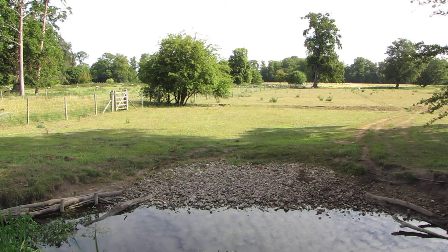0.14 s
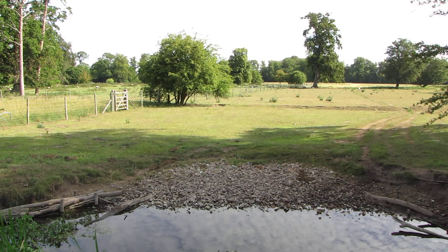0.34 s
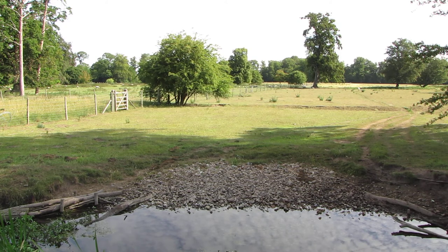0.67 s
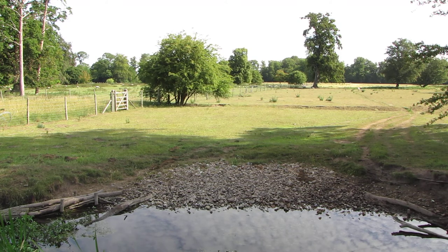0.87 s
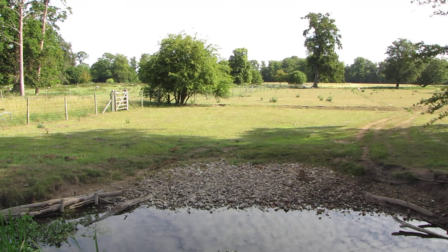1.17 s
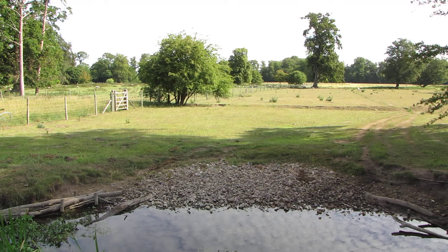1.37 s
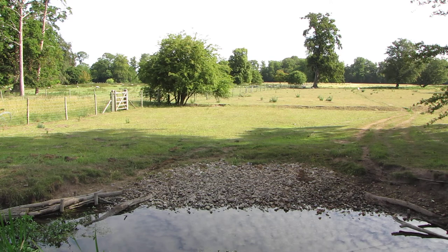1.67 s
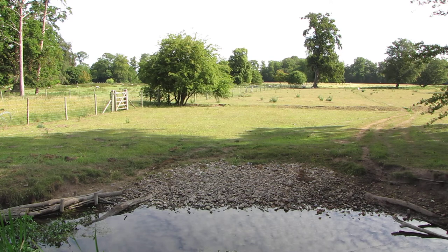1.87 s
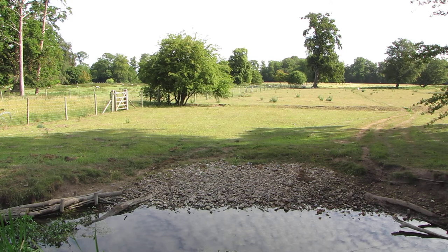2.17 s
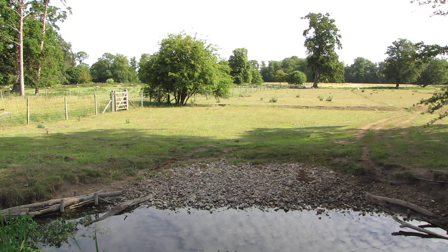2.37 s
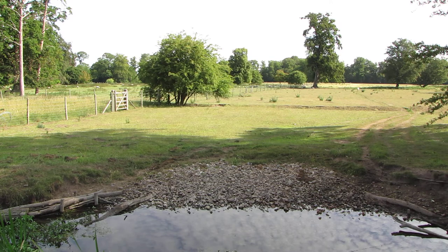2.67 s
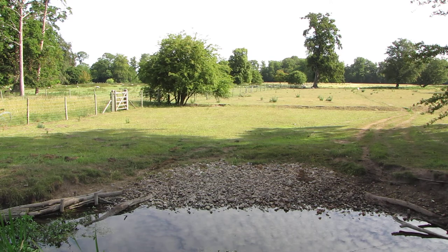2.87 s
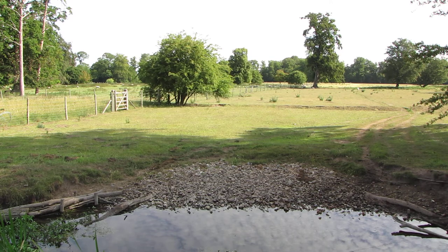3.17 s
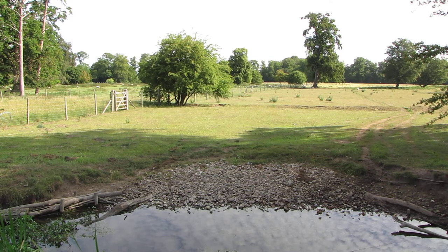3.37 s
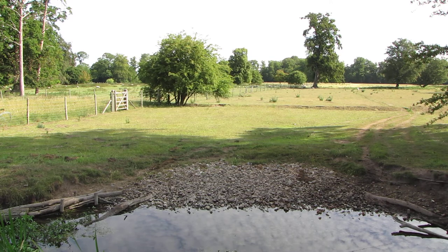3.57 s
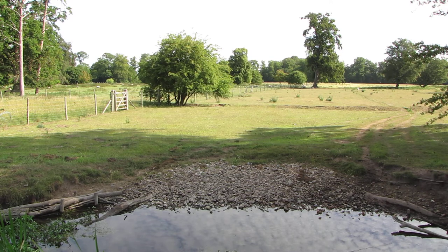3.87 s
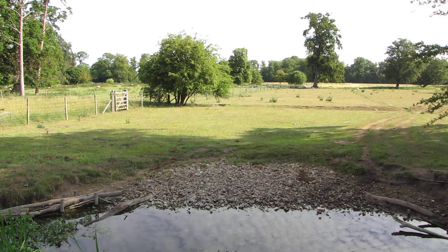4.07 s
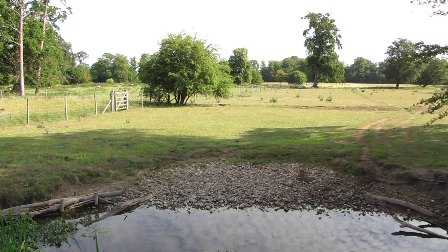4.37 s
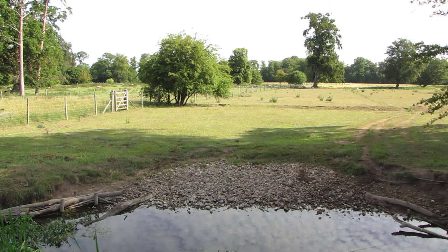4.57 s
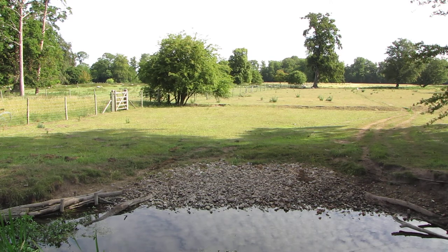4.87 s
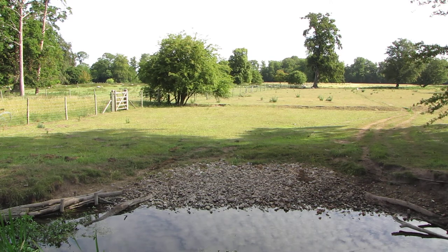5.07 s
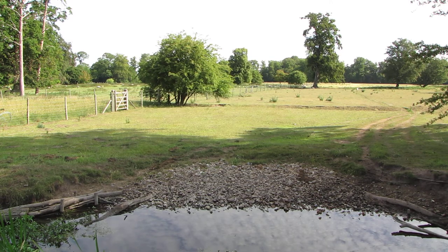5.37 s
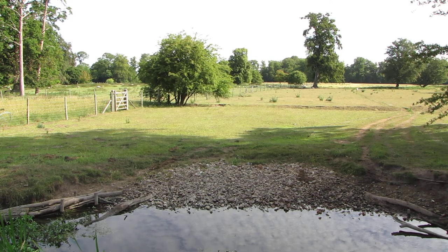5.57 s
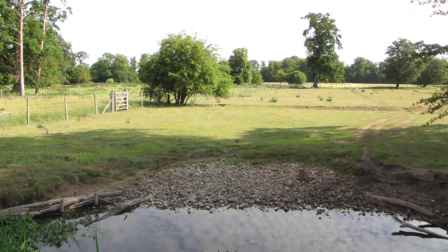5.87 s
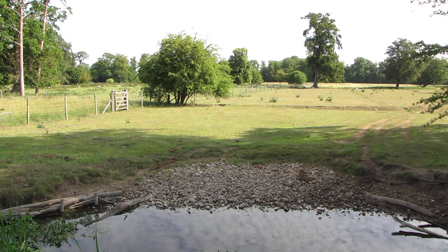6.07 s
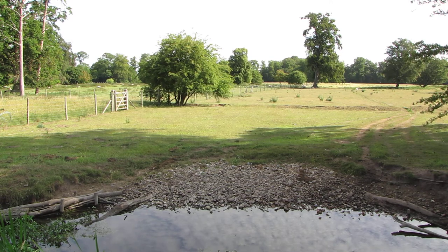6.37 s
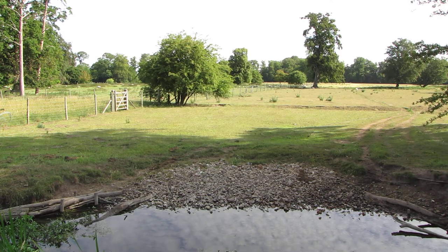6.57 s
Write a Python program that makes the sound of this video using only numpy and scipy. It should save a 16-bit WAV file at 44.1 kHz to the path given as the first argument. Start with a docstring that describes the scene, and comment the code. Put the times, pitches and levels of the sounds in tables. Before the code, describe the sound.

Quiet field beside a pond, heard through a hissy stereo microphone exposed to wind. Distant tyres and engines hum continuously, slightly to the right. Sparse tiny bird calls come first, then a faint slowing rattle, perhaps a farther sheep, then two clear rising whistles and small cheeps. Low gusts buffet more strongly in the second half, around a single weak, quavering sheep bleat near the end.

```python
"""Open pasture with trees

A distant sheep bleats once by pulse-driven resonance, after a fainter rasping chatter of rough pulses.
Small birds whistle and cheep as sines of moving pitch, and the trees scatter these calls.
Far traffic drones from the right and wind buffets two microphone ports, both as coloured noise;
the microphones hiss."""
import sys
import numpy as np
from scipy import signal
from scipy.fft import rfft, irfft, next_fast_len
from scipy.io import wavfile
from scipy.ndimage import uniform_filter1d

SR = 44100
rng = np.random.default_rng(int(sys.argv[2]) if len(sys.argv) > 2 else 0)


def transcribe(u):
    """Save the signal u as a 16-bit wav file named by the first command-line argument.

    u: samples, shape (n,) or (channels, n), limited to [-1, 1]; the rate is SR.
    q: integer samples, one column per channel.
    """
    v = np.clip(np.atleast_2d(u).T, -1, 1)
    q = np.round(v * 32767).astype(np.int16)
    wavfile.write(sys.argv[1], SR, q)


N = 296793  # length in samples

LAG_S_PER_DB = 2.8e-5  # delay between the ports for each dB of level difference


def undb(db):
    """Decibel law: the amplitude gain of a level in dB."""
    return 10 ** (np.asarray(db) / 20)


def unit(x):
    """Normalisation: scales a signal to rms 1."""
    return x / np.sqrt(np.mean(x ** 2))


def along(hz, table):
    """Logarithmic frequency scale: interpolates (f/Hz, value) points."""
    f, values = np.transpose(table)
    return np.interp(np.log(hz + 1e-3), np.log(f), values)


def curve(table):
    """Linear interpolation in time: the columns of a (t/s, value, ..) table, one value a sample."""
    s, *columns = np.transpose(table)
    return [np.interp(np.arange(N) / SR, s, c) for c in columns]


def pan(db):
    """Interaural level difference: left and right gains for a left minus right level in dB."""
    return undb(np.array([db, -db]) / 2).reshape(2, -1)


def walk(rate_hz):
    """Slow random modulation: levels held, then smoothed by two moving averages; rms 1."""
    k = int(SR / rate_hz)
    held = np.repeat(rng.standard_normal(N // k + 1), k)
    return unit(uniform_filter1d(uniform_filter1d(held, k), k)[:N])


def noise(colour, shared=((1, 0),), lag_s=0., balance=((1, 0),)):
    """Partial coherence: coloured noise with a shared part, late on the left, and each port's own."""
    size = next_fast_len(N)
    hz = np.arange(size // 2 + 1) * SR / size
    both, left, right = rfft(rng.standard_normal((3, size)))
    share = np.clip(along(hz, shared), 0, 1)
    lag = np.array([np.exp(-2j * np.pi * hz * lag_s), np.ones(len(hz))])
    pair = np.sqrt(share) * both * lag
    pair = pair + np.sqrt(1 - share) * np.array([left, right])
    spectrum = pair * undb(along(hz, colour)) * pan(along(hz, balance))
    return unit(irfft(spectrum, size)[:, :N])


def ring(x, hz, width_hz):
    """Resonance: a band-pass peak applied twice, gain 1 at the centre."""
    b, a = signal.iirpeak(hz, hz / width_hz, SR)
    return signal.lfilter(b, a, signal.lfilter(b, a, x))


def pulses(hz, jitter):
    """Irregular pulse train: one click a cycle, the cycles uneven in length and size."""
    cycle = np.floor(np.cumsum(hz * (1 + jitter * walk(180))) / SR)
    return np.diff(cycle, prepend=cycle[0]) * undb(1.9 * rng.standard_normal(N))


# course of the bleat: t/s, pitch f/Hz, level/dB before the quaver, quaver depth (0-1), mouth opening (0-1)
BLEAT_COURSE = [(5.16, 198.7, -72, .6, 0), (5.235, 199.4, -57, .6, 0), (5.4, 206, -55, .58, 0.75),
                (5.48, 223.2, -55, .32, .85), (5.6, 224, -56.5, .2, .85), (5.72, 220.4, -57.5, .12, .85),
                (5.84, 221.7, -62, 0, .7), (6.0, 219, -70, .1, .6)]
# throat resonances: f/Hz, width/Hz, level/dB, level gained with the mouth fully open/dB
THROAT_RESONANCES = [(1740, 340, 1, 1), (2750, 420, -1.5, 0), (3540, 600, -8.5, 5), (4200, 520, -23, 14)]
QUAVER_HZ, QUAVER_TOP_S = 13.4, 5.325  # rate; time of one crest
QUAVER_PITCH = .03  # pitch swing as a share of the pitch, at full depth
BLEAT_TOP_HZ = 4400


def sheep():
    """Source-filter principle: glottal pulses and breath ring the throat, quavering in level and pitch."""
    t = np.arange(N) / SR
    hz, db, depth, mouth = curve(BLEAT_COURSE)
    quaver = np.cos(2 * np.pi * QUAVER_HZ * (t - QUAVER_TOP_S))
    breath = .5 * rng.standard_normal(N)
    voice = unit(pulses(hz * (1 + QUAVER_PITCH * depth * quaver), jitter=.02)) + breath
    throat = np.zeros(N)
    for k, (f, width_hz, level_db, open_db) in enumerate(THROAT_RESONANCES):
        # neighbouring resonances swing in opposite senses, which fills the valleys between them
        throat += (-1) ** k * undb(level_db + open_db * mouth) * ring(voice, f, width_hz)
    low_pass = signal.butter(8, BLEAT_TOP_HZ, fs=SR, output="sos")
    throat = signal.sosfilt(low_pass, throat)
    start, end = BLEAT_COURSE[0][0], BLEAT_COURSE[-1][0]
    sounding = undb(db) * (np.abs(t - (start + end) / 2) < (end - start) / 2)
    return pan(0.27) * unit(throat) * sounding * (1 + np.clip(depth, 0, 1) * quaver)


# rasps, perhaps a farther sheep's broken bleat
RASP_HZ, CHATTER_COUNT = 197, 7  # mean pulse rate; number of rasps
CHATTER_HZ, CHATTER_WIDTH_HZ, CHATTER_WIDENS_HZ = 3570, 820, 120  # resonance, width, widening a rasp
CHATTER_DB, CHATTER_FADE_DB = -57, -.6  # first level, change a rasp
CHATTER_START_S, CHATTER_GAP_S = 2.112, 0.063  # centre of the first rasp, basic spacing
CHATTER_SLOWING_S = .0021  # added delay times the rasp number squared
RASP_OVERLAP = 1.2  # length of a rasp in gaps
CHATTER_PAN_DB = -6  # left minus right


def chatter():
    """Source-filter principle: rough pulses and breath in a wide resonance, slowing, widening and fading."""
    out = np.zeros(N)
    rasp = unit(pulses(np.full(N, 1. * RASP_HZ), jitter=0.11)) + 1.5 * rng.standard_normal(N)
    for k in range(CHATTER_COUNT):
        n = int(RASP_OVERLAP * (CHATTER_GAP_S + 2 * k * CHATTER_SLOWING_S) * SR)
        centre_s = CHATTER_START_S + k * CHATTER_GAP_S + k ** 2 * CHATTER_SLOWING_S
        i = int(centre_s * SR) - n // 2
        note = unit(ring(rasp[i:i + n], CHATTER_HZ, CHATTER_WIDTH_HZ + k * CHATTER_WIDENS_HZ))
        out[i:i + n] += undb(CHATTER_DB + k * CHATTER_FADE_DB) * np.hanning(n) * note
    late = int(round(-CHATTER_PAN_DB * LAG_S_PER_DB * SR))  # the far port hears it later
    return pan(CHATTER_PAN_DB) * np.array([np.roll(out, late), out])


def add(out, s, hz, envelope, pan_db):
    """Interaural time difference: a sine of moving pitch reaches the nearer, louder port first."""
    note = np.sqrt(2) * envelope * np.sin(2 * np.pi * np.cumsum(hz) / SR)
    for ch, side in enumerate((-1, 1)):
        i = int(round((s + side * pan_db * LAG_S_PER_DB / 2) * SR))
        out[ch, i:i + len(note)] += pan(pan_db)[ch] * note


ATTACK_S, RELEASE_S = .012, .015


def fading(length_s, db, fade_db):
    """Exponential decay: a whistled note's attack, steady fade in dB and release."""
    t = np.arange(int(length_s * SR)) / SR
    edges = np.clip(np.minimum(t / ATTACK_S, (length_s - t) / RELEASE_S), 0, 1)
    return undb(db + fade_db * t / length_s) * edges


# whistles that hook upward and hold: t/s, length/s, start f/Hz, held f/Hz, glide/s, level/dB, fade/dB,
# left minus right level/dB
HOOKED_WHISTLES = [(1.097, .025, 3000, 5030, .016, -63.5, -10, 7),
                   (1.216, .075, 2920, 5720, .028, -65.5, -13, 0.5),
                   (1.528, .025, 3000, 4750, .02, -65, -8, -3),
                   (2.703, 0.073, 3840, 4880, 0.019, -60, -18, 1),
                   (3.472, .11, 2860, 4120, 0.034, -50.5, -7.5, -4),
                   (3.75, 0.098, 3010, 4130, 0.033, -55, -5, -3)]
# short sliding pips: t/s, length/s, start f/Hz, end f/Hz, level/dB, left minus right level/dB
SLIDING_PIPS = [(1.128, .022, 4860, 5250, -65, -1), (1.203, .018, 3250, 2950, -66, -1.5),
                (1.363, 0.02, 3770, 3900, -57, 0), (2.331, .035, 3230, 3000, -60, 4),
                (2.798, .045, 2820, 2830, -62, 10), (2.885, .04, 3120, 2970, -61, 10.5),
                (2.926, .03, 3070, 2950, -60, 1), (3.127, .02, 3150, 3100, -66, 9)]
# husky cheeps: t/s, start f/Hz, end f/Hz, level/dB, left minus right level/dB
HUSKY_CHEEPS = [(2.76, 6470, 5720, -68.5, 1), (2.785, 3850, 3840, -63, -6),
                (3.435, 5600, 6200, -61.5, -2.5), (3.42, 3470, 3370, -63, 4), (3.68, 4550, 5400, -64, -3),
                (3.87, 4160, 4200, -65, 9), (4.085, 4500, 4510, -68, 0), (4.145, 6500, 6270, -65, 12),
                (4.181, 5400, 4750, -65, -0.5), (4.39, 7300, 6700, -66, 5), (4.43, 6500, 6040, -63, 4.5),
                (4.7, 6500, 6100, -66, 10.5), (4.68, 5750, 5200, -63, 0)]
HOOK_BEND, WAVER_HZ = 1.6, 40  # exponent of the glide; rms pitch waver of whistles and pips
PIP_FADE_DB = -3.5
CHEEP_S, CHEEP_SPREAD = 0.089, .09  # length; pitch shake as a share of the pitch
SHIMMER_DB, SHIMMER_HZ = 1.2, 90.8  # moving air makes far whistles flicker: spread and rate


def birds():
    """Frequency modulation: whistles hook up and hold, pips slide, cheeps shake fast round a slide."""
    out, shake = np.zeros((2, N)), walk(900)
    for s, length_s, from_hz, to_hz, glide_s, db, fade_db, pan_db in HOOKED_WHISTLES:
        t = np.arange(int(length_s * SR)) / SR
        hz = to_hz + (from_hz - to_hz) * np.clip(1 - t / glide_s, 0, 1) ** HOOK_BEND
        hz = hz + WAVER_HZ * shake[int(s * SR):][:len(hz)]
        add(out, s, hz, fading(length_s, db, fade_db), pan_db)
    for s, length_s, from_hz, to_hz, db, pan_db in SLIDING_PIPS:
        hz = np.linspace(from_hz, to_hz, int(length_s * SR))
        hz = hz + WAVER_HZ * shake[int(s * SR):][:len(hz)]
        add(out, s, hz, fading(length_s, db, PIP_FADE_DB), pan_db)
    for s, from_hz, to_hz, db, pan_db in HUSKY_CHEEPS:
        hz = np.linspace(from_hz, to_hz, int(CHEEP_S * SR))
        hz = hz * (1 + CHEEP_SPREAD * shake[int(s * SR):][:len(hz)])
        add(out, s, hz, undb(db) * np.hanning(len(hz)), pan_db)
    return out * undb(SHIMMER_DB * walk(SHIMMER_HZ))


TREES_T60_S, TREES_GAP_S, TREES_DB = .22, 0.0037, -3  # decay by 60 dB, delay of the tail, its level


def trees(x):
    """Diffuse scattering: trunks and leaves add a short, dense tail, unlike at the two ports."""
    t = np.arange(SR // 2) / SR
    decay = np.exp(-np.log(1000) * t / TREES_T60_S) * (t > TREES_GAP_S)
    tail = rng.standard_normal((2, len(t))) * decay
    tail = undb(TREES_DB) * tail / np.sqrt(np.sum(tail ** 2, axis=1, keepdims=True))
    return x + signal.fftconvolve(x, tail, axes=1)[:, :N]


# gusts at the ports: t/s, level/dB (3 dB below the rms over both ports), left minus right level/dB
GUST_COURSE = [(0.0, -45.5, 9), (0.3, -47, 8.5), (1.1, -47.5, 6), (1.45, -56.5, 0), (1.66, -42, 4),
               (2.0, -47.5, 0), (2.6, -56, -10), (3.2, -45.5, 8), (3.6, -43.5, 7), (3.8, -47.5, 6),
               (4.1, -36.5, 4.5), (4.3, -36.5, -6), (4.4, -33.5, -8), (4.5, -37.5, -6), (4.75, -35.5, -3),
               (5.05, -42.5, -7), (5.55, -46.5, 2), (5.68, -41, -9), (5.86, -55, 4), (6.12, -34, -5.5),
               (6.26, -42, -7), (6.73, -35, -7)]
# low wind spectrum: f/Hz, level per Hz/dB
WIND_SPECTRUM = [(3, -30), (8, -12), (16, -4), (30, 0), (50, -3), (75, -13), (120, -30), (200, -52),
                 (400, -110)]
# spectrum of the higher flutter: f/Hz, level per Hz/dB
FLUTTER_SPECTRUM = [(30, -30), (60, -3), (85, 0), (120, -8), (170, -22), (260, -45), (500, -110)]
EDDY_DB, EDDY_HZ = 2.5, 14  # each port's own flicker: spread and rate
GUST_BRIGHT = 1.7  # flutter amplitude grows as the gust amplitude to this power
BRIGHT_DB = -9.5  # flutter relative to the low wind, where the port gain is -32 dB


def wind():
    """Turbulent pressure: eddies thump each port on its own; strong gusts add a higher flutter."""
    db, pan_db = curve(GUST_COURSE)
    split = pan(pan_db)
    eddies = EDDY_DB * np.array([walk(EDDY_HZ), walk(EDDY_HZ)])
    port = undb(db + eddies) * 2 * split / np.sqrt(np.sum(split ** 2, axis=0))
    flutter_gain = undb(BRIGHT_DB) * (port / undb(-32)) ** (GUST_BRIGHT - 1)
    return port * (noise(WIND_SPECTRUM) + flutter_gain * noise(FLUTTER_SPECTRUM))


# tyre spectrum: f/Hz, level per Hz/dB
TYRE_SPECTRUM = [(120, -46), (200, -19.5), (260, -19), (550, -19.5), (800, -17.5), (1020, -14),
                 (1400, -17.5), (1800, -20.5), (2200, -25.5), (2700, -32.5), (3200, -38), (4200, -43.5),
                 (6000, -64)]
# coherence of the tyres: f/Hz, power share heard alike at both ports (0-1)
TYRE_SHARED = [(300, 0.69), (900, 0.87), (1600, 0.59), (2300, 0.38), (3200, 0.14)]
# balance of the tyres: f/Hz, left minus right level/dB
TYRE_BALANCE = [(500, 0), (1200, -1.1), (2500, -4)]
# heavy engines far off: t/s, level/dB of the low hum, tilt towards the higher hum (0-1)
RUMBLE_COURSE = [(0, -47.5, 0.23), (1.3, -46.5, 0.3), (2.2, -44.5, 0.17), (3.3, -46, 0.39),
                 (4.4, -45.5, 0.15), (5.4, -44.5, 0.4), (6.73, -48.5, .6)]
# low hum spectrum: f/Hz, level per Hz/dB
LOW_HUM_SPECTRUM = [(25, -12.5), (50, -1), (90, 0.5), (122, -4.5), (145, -14), (260, -31), (500, -96)]
# higher hum spectrum: f/Hz, level per Hz/dB
HIGH_HUM_SPECTRUM = [(60, -14), (110, -10.5), (160, -7), (195, -10.5), (250, -37), (500, -85)]
ROAD_DB, ROAD_FADE_DB_PER_S = -47.5, -0.1673  # tyres: first level and its drift
ROAD_LAG_S = 1.15e-4  # delay of the left port
RUMBLE_HIGH_DB, RUMBLE_SHARED = -3, 0.92  # higher hum at full tilt, relative to low; shared power


def road():
    """Partial coherence: smooth noise of far tyres and engines, partly scattered by the trees."""
    tyre_db = ROAD_DB + ROAD_FADE_DB_PER_S * np.arange(N) / SR + 0.45 * walk(2.05)
    tyres = undb(tyre_db) * noise(TYRE_SPECTRUM, TYRE_SHARED, ROAD_LAG_S, TYRE_BALANCE)
    db, tilt = curve(RUMBLE_COURSE)
    low = noise(LOW_HUM_SPECTRUM, [(1, RUMBLE_SHARED)], ROAD_LAG_S)
    high = noise(HIGH_HUM_SPECTRUM, [(1, RUMBLE_SHARED)], ROAD_LAG_S)
    engines = low + undb(RUMBLE_HIGH_DB) * np.clip(tilt, 0, 1) * high
    return tyres + undb(db + walk(2.074)) * engines


def scene():
    """Superposition: animals among the trees, over road and wind."""
    return trees(sheep() + chatter() + birds()) + road() + wind()


# hiss spectrum: f/Hz, level per Hz/dB
HISS_SPECTRUM = [(1500, -4), (2500, -6.5), (3100, -6), (3800, -8.5), (4600, -8.5), (6500, -10), (9500, -10),
                 (11200, -10.5), (12300, -6), (13600, -2.5), (15800, -4.5)]
# coherence of the hiss: f/Hz, power share heard alike at both ports (0-1)
HISS_COHERENCE = [(8000, 0.018), (10500, 0.16), (13000, 0.093)]
# balance of the hiss: f/Hz, left minus right level/dB
HISS_BALANCE = [(9000, 0.8), (11800, 0.5), (13500, 2.5), (14500, -2)]
HISS_DB, HISS_LAG_S = -54, -1.65e-4  # level before the top cut; negative lag: the left leads
TOP_HZ = 15780


def record(dry):
    """Self-noise and band limit: hiss, strongest at the microphones' treble resonance, and a top cut."""
    hiss = noise(HISS_SPECTRUM, HISS_COHERENCE, HISS_LAG_S, HISS_BALANCE)
    wet = dry + undb(HISS_DB) * hiss
    top_cut = signal.ellip(12, .2, 80, TOP_HZ, fs=SR, output="sos")
    return signal.sosfilt(top_cut, wet)


dry = scene()
out = record(dry)
transcribe(out)
```